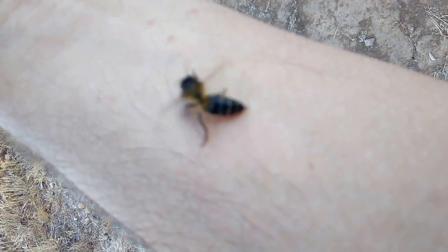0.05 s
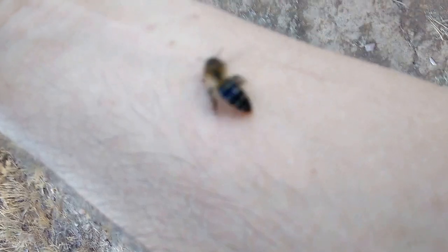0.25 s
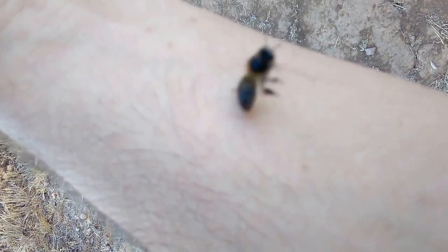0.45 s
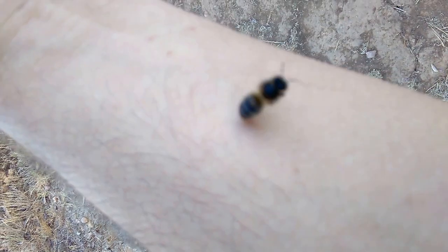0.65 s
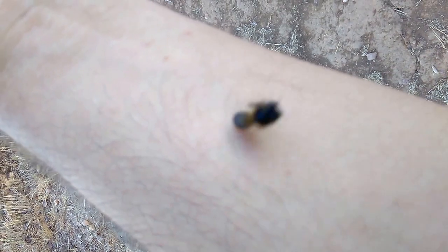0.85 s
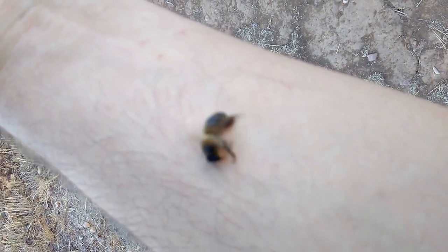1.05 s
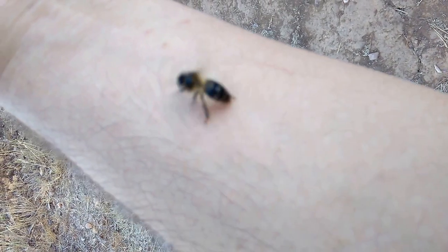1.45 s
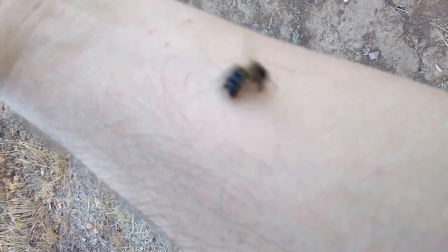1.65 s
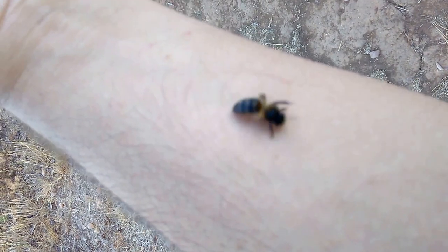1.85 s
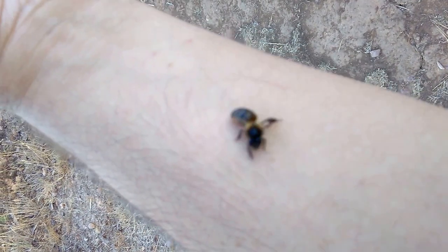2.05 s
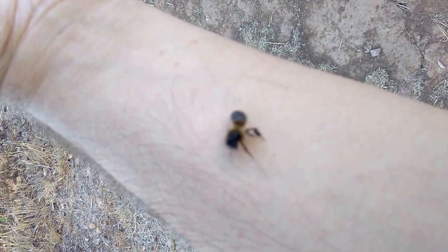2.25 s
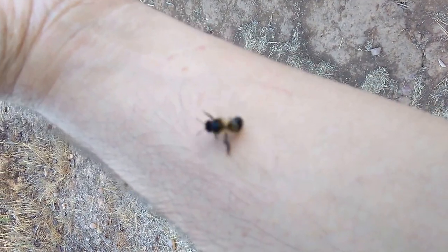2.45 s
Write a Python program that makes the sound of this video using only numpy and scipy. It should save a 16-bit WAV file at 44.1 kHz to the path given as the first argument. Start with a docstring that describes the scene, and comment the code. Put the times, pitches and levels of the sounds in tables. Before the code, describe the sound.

Close, rough buzzing of a bee over more humming bees and a faint breeze.

```python
"""Outdoors, a honeybee buzzes close to the microphone while more bees hum around it.
Each wingbeat gives a pulse and a puff of hiss; harsh flares come as the wings pass closest.
Light wind buffets the microphone over a faint hiss, and there is one soft knock.
The sound cuts in from silence with a soft pop."""
import sys
import numpy as np
from scipy import signal
from scipy.fft import rfft, irfft
from scipy.io import wavfile
from scipy.ndimage import uniform_filter1d, map_coordinates

SR = 44100
rng = np.random.default_rng(int(sys.argv[2]) if len(sys.argv) > 2 else 0)


def log_audio(samples):
    """Write samples as a 16-bit WAV file to the path given in sys.argv[1]."""
    # one column per channel
    frames = np.atleast_2d(samples).T
    # limit to full scale, then quantise
    limited = np.clip(frames, -1, 1)
    pcm = np.round(limited * 32767).astype(np.int16)
    wavfile.write(sys.argv[1], SR, pcm)


N = 110250
T = np.arange(N) / SR
START_S = .2415
WINGBEAT_JITTER = .005  # fraction of the rate
WIDE = np.array([[1], [-1]])  # opposite in the two channels


def amp(db):
    """Decibels to gain."""
    return 10 ** (np.asarray(db) / 20)


def unit(x):
    """Scales to unit rms."""
    return x / np.sqrt(np.mean(x ** 2) + 1e-20)


def curve(rows):
    """Joins (seconds, value) rows with straight lines."""
    return np.interp(T, *np.transpose(rows))


def gain_at(spectrum, hz):
    """Gain of a spectrum at the given frequencies."""
    points_hz, db = np.transpose(spectrum)
    return amp(np.interp(np.log(hz + 1), np.log(points_hz), db))


def colour(x, spectrum):
    """Filters by a spectrum, to unit rms."""
    return unit(irfft(rfft(x) * gain_at(spectrum, np.fft.rfftfreq(N, 1 / SR)), N))


def noise(spectrum):
    """Coloured noise at unit rms."""
    return colour(rng.standard_normal(N), spectrum)


def drift(rate_hz):
    """Smooth random motion of about unit size."""
    knots = rng.standard_normal(1024)
    coarse_s = T[::100]
    return np.interp(T, coarse_s, map_coordinates(knots, [coarse_s * rate_hz], order=3, mode="wrap"))


def swell(centre_s, peak_db, sigma_s):
    """Gaussian envelope."""
    return amp(peak_db) * np.exp(-((T - centre_s) / sigma_s) ** 2 / 2)


def pop(peak_db=-25, decay_s=.049):
    """Decaying offset, heard as a pop when the microphone cuts in."""
    return amp(peak_db) * np.exp(-np.maximum(T - START_S, 0) / decay_s)


# Wingbeat of the near bee. Each row: time in seconds, rate in Hz.
WINGBEAT_HZ = [(.26,232),(.3,247),(.35,256),(.4,249),(.425,235),(.485,237),(.515,251),(.54,243),(.61,238),(.63,245),(.69,248),(.745,238),(.8,245),(.88,238),(.99,235),(1.015,228),(1.065,246),(1.11,236),(1.14,243),(1.24,242),(1.29,248),(1.34,267),(1.385,260),(1.42,267),(1.5,256),(1.55,239),(1.635,226),(1.66,233),(1.71,233),(1.76,254),(1.79,245),(1.87,248),(1.91,242),(1.955,250),(1.99,224),(2.03,237),(2.135,224),(2.2,242),(2.245,227),(2.34,244),(2.38,236),(2.47,250)]


def wingbeat():
    """The near bee's wing phase in turns and its jittering rate in Hz."""
    hz = curve(WINGBEAT_HZ) * (1 + WINGBEAT_JITTER * drift(rate_hz=70))
    return np.cumsum(hz) / SR, hz


def harmonics(turns, hz, spectrum, flutter_hz, twist_rad, count, flutter_db=2, smear_hz=2860):
    """Wingbeat harmonics, each fluttering quickly and at random, giving a rough tone."""
    out = np.zeros(N)
    for k in range(1, count + 1):
        lag_turns = 1.5 * max(1 - k * hz.mean() / smear_hz, 0) ** 2  # lows lag, highs click together
        gain = gain_at(spectrum, k * hz) * amp(flutter_db * drift(flutter_hz))
        out += gain * np.cos(2 * np.pi * (k * turns + lag_turns) + twist_rad * drift(flutter_hz))
    return unit(out)


def pulses(turns, count=58):
    """One sharp pulse per wingbeat: equal harmonics in phase."""
    half_rad = np.pi * (turns % 1) + 1e-7
    return np.sin((2 * count + 1) * half_rad) / np.sin(half_rad) - 1


def puffs(turns, spectrum, floor, width_turns=.089):
    """Hiss of steady average power that swells once per wingbeat."""
    from_beat = (turns + .5) % 1 - .5
    gate = floor + np.exp(-(from_beat / width_turns) ** 2)
    gate /= np.sqrt(uniform_filter1d(gate ** 2, size=720))
    return colour(gate * rng.standard_normal(N), spectrum)


# Hum loudness. Each row: time in seconds, relative level in dB.
HUM_LEVEL_DB = [(.27,-56),(.58,-59),(.64,-51),(.69,-61),(.85,-52),(.96,-51),(1.01,-63),(1.06,-55),(1.33,-57),(1.45,-52),(1.55,-54),(1.59,-64),(1.8,-53),(1.94,-47.5),(2.02,-54),(2.48,-55)]
# Spectra of the hum and its nasal edge. Each row: frequency in Hz, gain in dB.
HUM_SPECTRUM = [(240, -28), (400, -4.5), (490, -0.5), (700, -17.5), (950, -10), (2000, -38.5)]
NASAL_SPECTRUM = [(1900, -10), (2400, 3.5), (2700, 4.5), (3200, -25)]


def hum(turns, hz, flutter_hz=33.87):
    """Fluttering low wing harmonics with a faint broken fundamental and a nasal edge."""
    low = harmonics(turns, hz, HUM_SPECTRUM, flutter_hz, twist_rad=1, count=8)
    fundamental = unit(drift(flutter_hz) * np.sin(2 * np.pi * turns))
    nasal_db = -66.5 + 3 * drift(rate_hz=16)
    nasal = harmonics(turns, hz, NASAL_SPECTRUM, flutter_hz, twist_rad=.9, count=13)
    return amp(curve(HUM_LEVEL_DB) - 3.5) * low + amp(-65) * fundamental + amp(nasal_db) * nasal


# Buzz loudness. Each row: time in seconds, relative level in dB.
BUZZ_LEVEL_DB = [(.26,-67),(.43,-64.5),(.47,-68),(.55,-60),(.63,-71),(.98,-67.5),(1.11,-59),(1.135,-61),(1.15,-80),(1.21,-59),(1.3,-63),(1.48,-62),(1.55,-70),(1.635,-61.5),(1.66,-72),(1.75,-61),(1.79,-66),(1.9,-63),(1.975,-71.5),(2.0,-67),(2.1,-66),(2.3,-62),(2.37,-71.5),(2.48,-70)]
# Buzz spectrum. Each row: frequency in Hz, gain in dB.
BUZZ_SPECTRUM = [(600, -16), (1100, -8.5), (1650, 9), (2050, -19.5), (2550, 0), (3000, 0), (3500, 10),
                 (4100, 5), (5000, -5.5), (6500, -18), (14000, -45)]


def buzz(turns, hz):
    """Wing overtones with a rasp of hiss on each beat."""
    overtones = harmonics(turns, hz, BUZZ_SPECTRUM, flutter_hz=22.12, twist_rad=.3, count=24)
    rasp = puffs(turns, BUZZ_SPECTRUM, floor=.27)
    return amp(curve(BUZZ_LEVEL_DB)) * (amp(.5) * overtones + amp(-12) * rasp)


# Fizz loudness. Each row: time in seconds, relative level in dB.
FIZZ_LEVEL_DB = [(0.26, -67.5), (0.4, -65), (0.49, -59), (0.56, -64.5), (0.78, -60.5), (0.86, -65),
                 (0.91, -63), (0.98, -65), (1.02, -57), (1.06, -63.5), (1.2, -54), (1.27, -63), (1.3, -57),
                 (1.34, -61), (1.36, -56), (1.38, -60.5), (1.49, -63), (1.51, -53), (1.53, -61),
                 (1.67, -58.5), (1.69, -72), (1.72, -56.5), (1.87, -62), (1.97, -50), (1.99, -58),
                 (2.14, -60.5), (2.22, -53.5), (2.37, -64.5), (2.41, -60.5), (2.48, -61)]
# Fizz spectrum. Each row: frequency in Hz, gain in dB.
FIZZ_SPECTRUM = [(4000, -68), (8000, -21), (10000, -14), (11400, -2.5), (12500, 4), (13500, 9.5),
                 (14400, -15.5)]


def fizz(turns):
    """Thin, wide treble puffs from the wings; the louder they are, the more they pulse."""
    level_db = curve(FIZZ_LEVEL_DB)
    mid, side = (puffs(turns, FIZZ_SPECTRUM, floor=amp(-59 - level_db)) for _ in range(2))
    flutter_db = 2 * drift(rate_hz=44.3)
    return amp(level_db + 4.5 + flutter_db) * (mid + WIDE * amp(-5) * side)


# Spectrum of the other bees. Each row: frequency in Hz, gain in dB.
SWARM_SPECTRUM = [(190, -24.5), (255, -7.5), (340, 1.5), (420, -3.5), (520, -2.5), (620, -13.5), (800, -16),
                  (1200, -14), (2050, -18.5), (2550, -16.5), (3000, -21), (3800, -20.5), (5500, -26),
                  (8000, -40)]


def swarm(count=7, centre_hz=243.7, spread=.105, rise_db_per_s=1.3):
    """Other bees, each on its own wandering pitch, coming and going and slowly drawing nearer."""
    bees = np.zeros(N)
    for detune in np.linspace(-spread, spread, count):
        hz = centre_hz * (1 + detune + .03 * drift(rate_hz=8) + WINGBEAT_JITTER * drift(rate_hz=60))
        bees += amp(3 * drift(rate_hz=7)) * pulses(np.cumsum(hz) / SR + rng.random())
    return amp(-54) * colour(bees * amp(rise_db_per_s * T), SWARM_SPECTRUM)


# Air hiss spectra, mid and side. Each row: frequency in Hz, gain in dB.
AIR_MID_SPECTRUM = [(30, -4), (150, -5), (350, -2), (900, 1.5), (2000, -20.5), (4000, -21.5), (6000, -19.5),
                    (8000, -23.5), (14000, -11.5)]
AIR_SIDE_SPECTRUM = [(3500, -44), (5000, -9), (8000, 8.5), (14000, -0.5)]


def air():
    """Faint steady hiss, wide in the treble."""
    return amp(-58) * noise(AIR_MID_SPECTRUM) + WIDE * amp(-76.5) * noise(AIR_SIDE_SPECTRUM)


# Gusts. Each row: time in seconds, level in dB.
GUST_LEVEL_DB = [(0.33, -48), (0.54, -51), (0.56, -51.5), (0.77, -49.5), (0.81, -43.5), (1.08, -40.5),
                 (1.14, -41.5), (1.23, -42.5), (1.27, -40), (1.29, -45.5), (1.74, -50.5), (1.77, -48.5),
                 (2.32, -55), (2.36, -41), (2.45, -55.5), (2.48, -49)]
# Rumble spectrum. Each row: frequency in Hz, gain in dB.
RUMBLE_SPECTRUM = [(10, -2), (30, 5), (70, -4.5), (110, -14), (300, -32.5), (1000, -58), (4000, -96)]
# Pressure bumps. Each row: centre in seconds, peak in dB, sigma in seconds.
BUFFETS = [(0.372, -43.5, 0.0036), (.529, -33, 0.0057), (0.824, -36.5, 0.0036), (.903, -36, 0.0026),
           (1.094, -36.5, 0.0031), (1.142, -31.5, 0.0015), (1.156, -28.5, 0.0034), (1.266, -33, 0.0031),
           (1.474, -42.5, 0.0025), (2.141, -42, 0.0027)]


def wind():
    """Wind on the microphone: gusty rumble and single pressure bumps."""
    out = amp(curve(GUST_LEVEL_DB)) * noise(RUMBLE_SPECTRUM)
    for centre_s, peak_db, sigma_s in BUFFETS:
        out += (1 - ((T - centre_s) / sigma_s) ** 2) * swell(centre_s, peak_db, sigma_s)
    return out


# Close wing passes. Each row: centre in seconds, relative peak in dB, sigma in seconds.
FLARES = [(.673, -62, 0.0038), (1.26, -76.5, 0.038), (1.509, -61.5, 0.0077), (1.634, -59, 0.0025),
          (1.84, -67, 0.032), (1.935, -58, 0.012), (1.967, -57.5, 0.0093), (2.215, -69, 0.027)]
# Flare spectrum. Each row: frequency in Hz, gain in dB.
FLARE_SPECTRUM = [(600, -14), (2000, -15), (2500, 14), (3100, -5), (3800, 11), (5500, 6), (7000, 0),
                  (9000, -15)]


def flares(turns):
    """Harsh bursts of pulses and hiss as the wings come closest."""
    clicks = colour(pulses(turns), FLARE_SPECTRUM)
    rasp = puffs(turns, FLARE_SPECTRUM, floor=.25, width_turns=.59)
    return sum(swell(*row) for row in FLARES) * (clicks + amp(-1) * rasp)


# Knock spectrum. Each row: frequency in Hz, gain in dB.
KNOCK_SPECTRUM = [(220, 8.5), (400, -23), (780, 12.5), (950, -8), (1300, -46)]


def knock():
    """One soft knock: a short burst of low noise."""
    return swell(centre_s=1.149, peak_db=-41.5, sigma_s=.0036) * noise(KNOCK_SPECTRUM)


def scene():
    """Bees, air, wind and knock, centred except for the treble."""
    turns, hz = wingbeat()
    near_bee = hum(turns, hz) + buzz(turns, hz) + flares(turns) + fizz(turns)
    return near_bee + swarm() + air() + wind() + knock()


def record(dry, cutoff_hz=14380):
    """The microphone cuts in with a pop; a steep low-pass limits the band."""
    live = (dry + pop()) * (T >= START_S)
    lowpass = signal.firwin(801, cutoff_hz, window=("kaiser", 9), fs=SR)
    return signal.oaconvolve(live, lowpass[None], "same")


dry = scene()
out = record(dry)
log_audio(out)
```